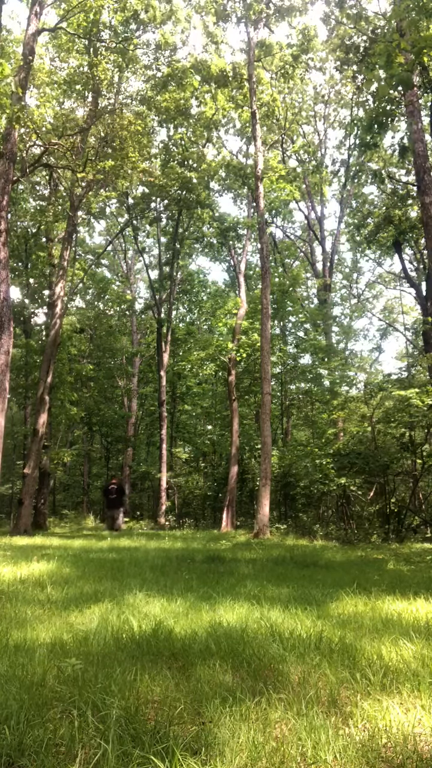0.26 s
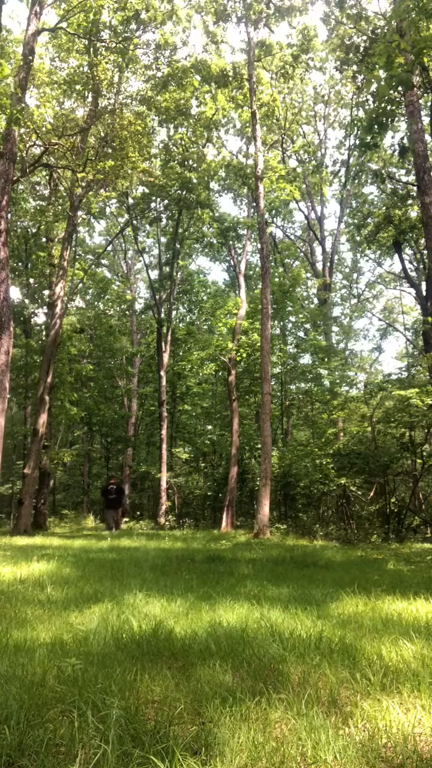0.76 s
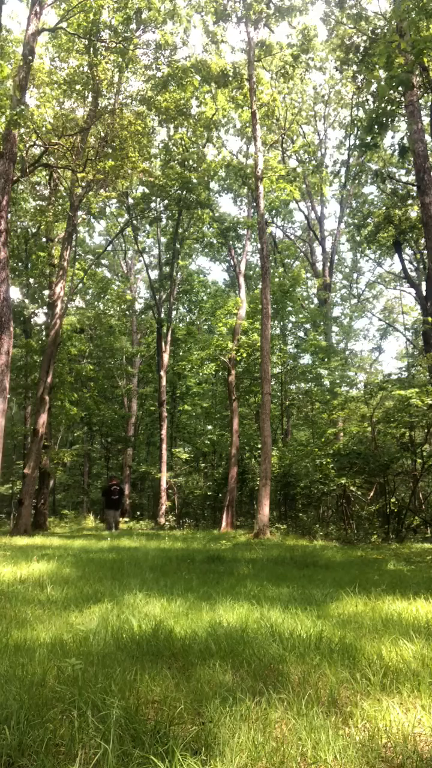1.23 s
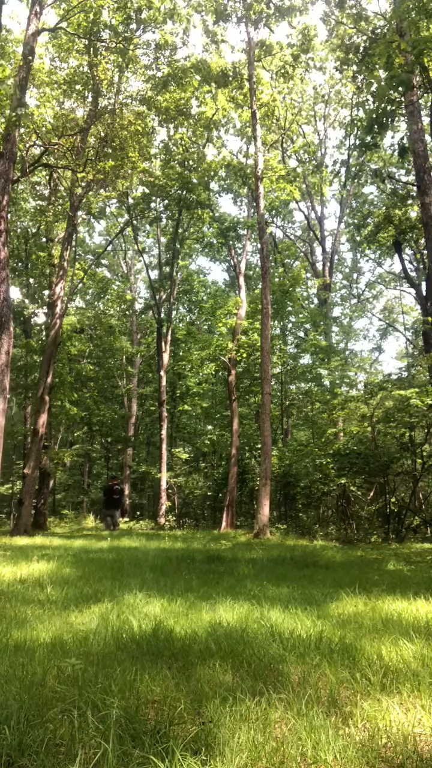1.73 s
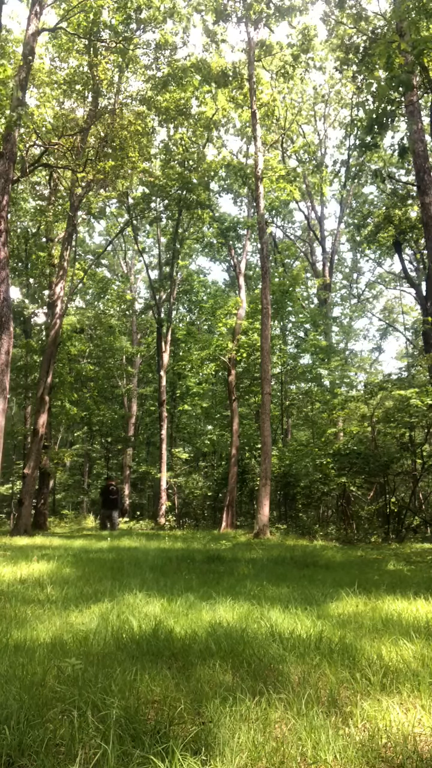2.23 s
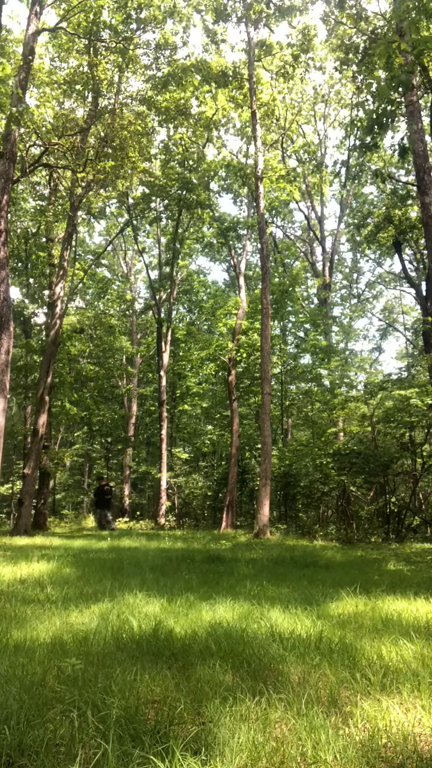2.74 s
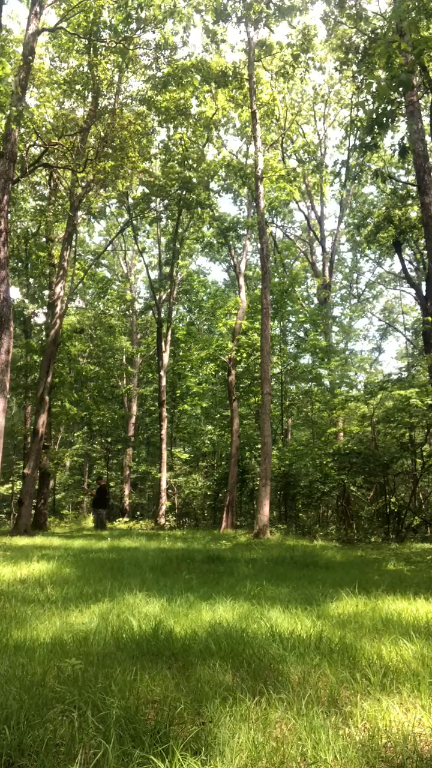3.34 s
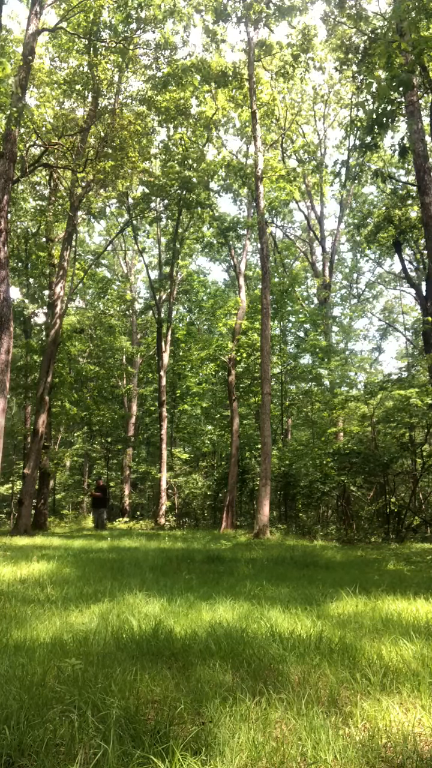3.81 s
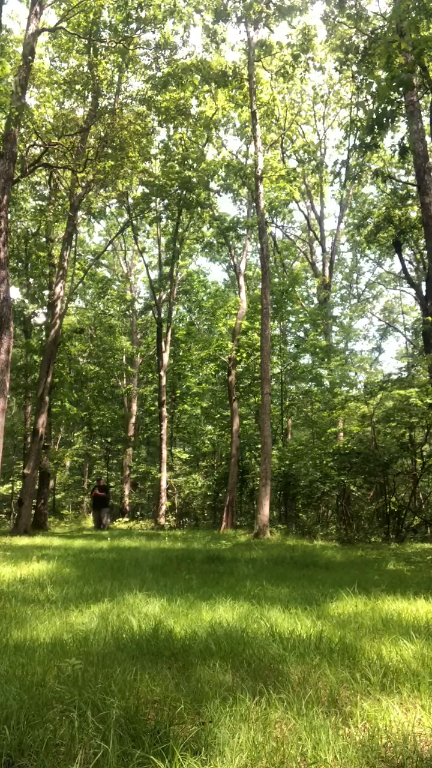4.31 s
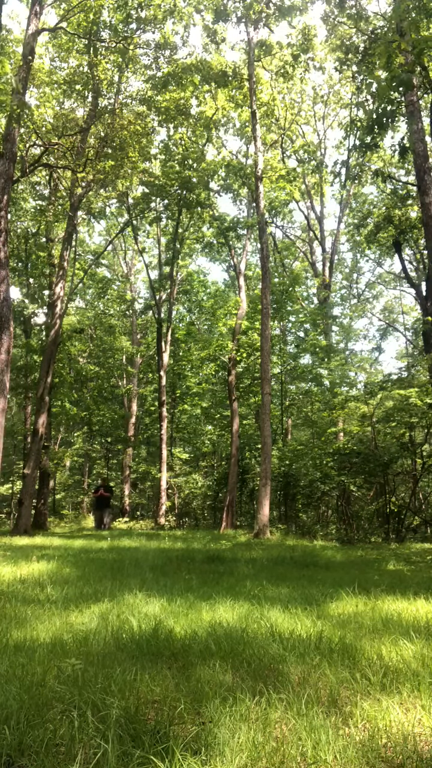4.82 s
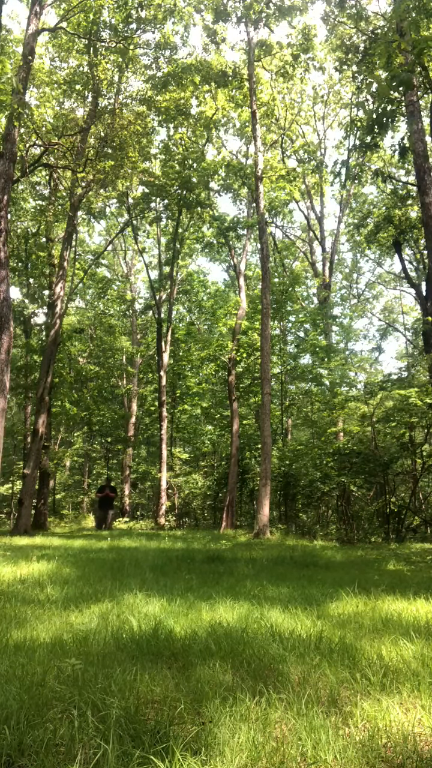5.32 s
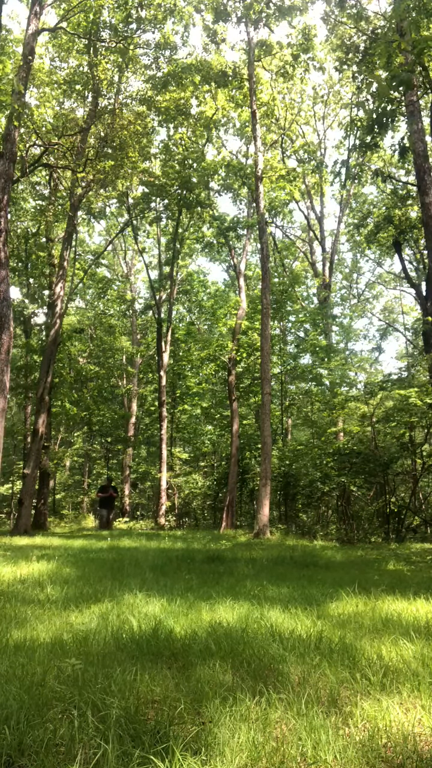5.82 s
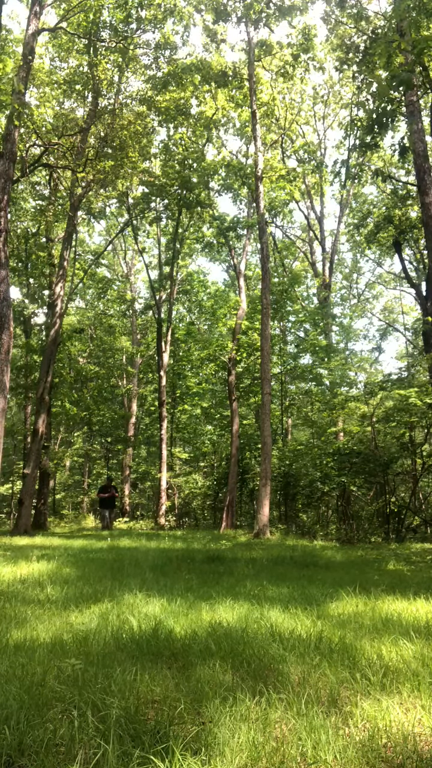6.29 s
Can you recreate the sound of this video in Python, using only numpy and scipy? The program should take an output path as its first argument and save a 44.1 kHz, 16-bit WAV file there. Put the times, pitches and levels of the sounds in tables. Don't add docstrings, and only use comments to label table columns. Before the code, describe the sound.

A distant wooden box call gives four raspy turkey-like yelps, quickening short clucks, then seven loud sharp cutts echoing through a quiet forest clearing.

```python
import sys
import numpy as np
from scipy import signal
from scipy.fft import rfft, irfft, next_fast_len
from scipy.io import wavfile
from scipy.ndimage import map_coordinates

SR = 44100
rng = np.random.default_rng(int(sys.argv[2]) if len(sys.argv) > 2 else 0)


def materialize(psi):
    bounded = np.clip(np.atleast_2d(psi).T, -1, 1)
    quanta = np.round(bounded * 32767).astype(np.int16)
    wavfile.write(sys.argv[1], SR, quanta)


def voltage_ratio(decibels):
    exponent = np.asarray(decibels, float) / 20
    return 10 ** exponent


N = 288855
LEAD = 4410

# (frequency [Hz], density [dB per Hz])
FOREST_RUMBLE = [(15, -47), (25, -7.5), (60, -3), (288, -16), (475, -16), (515, -13.5), (569, -16),
                 (849, -12), (1170, -19.5), (1290, -18), (1460, -19), (3000, -40.5), (3900, -87),
                 (6600, -120)]
# (time [s], level [dB])
RUMBLE_SWELL = [(0, -67), (2.7, -65), (3.3, -64), (5.1, -63.5), (6.55, -60.5)]
# (frequency [Hz], density [dB per Hz])
HISS = [(1180, -47), (2000, -6), (3020, -4), (3590, -5), (4270, -8), (7030, -12), (8420, -17),
        (15600, -21.5)]
# (time [s], level [dB])
ENGINE = [(0, -62.5), (.42, -68.5), (.58, -55.5), (.75, -70), (.93, -61.5), (1.79, -64.5), (2.06, -76),
          (2.44, -60), (2.72, -82), (3.4, -66), (3.67, -59), (5.09, -60), (5.75, -53.5), (6.55, -61)]
# (time [s], peak level [dB], frequency [Hz])
AIR_BUMPS = [
    (2.187, -47, 59.5),
    (2.449, -56, 56),
    (2.528, -50, 106),
    (2.639, -50, 98),
    (2.898, -48, 92),
    (3.068, -54, 83.4),
    (3.148, -44, 68.4),
    (3.248, -47.5, 107),
]
# (time [s], length [s], level [dB], start frequency [Hz], end frequency [Hz])
COOS = [
    (1.4, .68, -72, 520, 525),
    (2.13, .36, -69, 520, 520),
]
# (time [s], length [s], level [dB], start frequency [Hz], end frequency [Hz])
CHIRPS = [
    (1.72, .12, -83, 3300, 3900),
    (1.8, .11, -79, 2400, 2430),
    (1.85, .25, -85, 4050, 4030),
]
# (time [s], length [s], level [dB], start frequency [Hz], end frequency [Hz])
WHISTLES = [
    (2.47, .08, -77, 3700, 3680),
    (2.56, .1, -77, 3700, 3680),
]

# (frequency [Hz], time to fall 60 dB [s])
TRUNK_DECAY = [(1000, 1.16), (2500, 1.18), (5000, 0.72), (8000, 0.86), (14000, 0.13)]
# (frequency [Hz], gain [dB])
BARK_ECHO = [(1000, -18.5), (1400, 0), (1800, -5), (2600, -2.5), (4100, 5.5), (6000, 2), (10000, 2),
             (15000, 4)]
# (time [s], level towards the trees [dB])
FACING = [(0, 1.5), (.9, 1.1), (2.66, 1.5), (3.8, 0.5), (4.15, -0.5), (4.5, -3), (4.85, -4.5), (5.05, -0.1),
          (5.5, -2.9), (6.3, -1.8), (6.53, -7)]

# (time [s], clean part [s], raspy part [s], part on the wall's upper mode [s],
# level of that mode [dB])
YELPS = [
    (-0.047, .04, .066, .012, -4),
    (.25, .04, .072, 0, 0),
    (.552, .009, .07, .01, 1.5),
    (.846, .033, .041, .035, -4),
]
# (time [s], level [dB], settled slip rate [Hz], length [s],
# halfway lines at the end [dB])
CLUCKS = [(2.661, -45, 1483, 0.01, -10), (2.808, -42.5, 1443, 0.015, 1), (2.967, -47, 1409, 0.0132, 3),
          (3.31, -43.5, 1371, 0.013, -5.5), (3.451, -40.5, 1385, 0.013, -26),
          (3.619, -46.5, 1367, 0.014, -12), (3.786, -47, 1365, 0.016, 0), (3.949, -45.5, 1357, 0.018, -14),
          (4.116, -48, 1329, 0.017, -17), (4.285, -44, 1339, .016, -18), (4.457, -46, 1317, 0.018, -12.5),
          (4.641, -46.5, 1314, 0.015, -24), (4.832, -43, 1330, .023, -11.5),
          (5.031, -45.5, 1338, 0.0043, -22), (6.526, -48, 1340, .003, -18)]
# (time [s], level [dB], slip rate [Hz], length [s], halfway lines [dB])
CUTTS = [
    (5.034, -31, 1220, 0.029, -12.5),
    (5.249, -30, 1205, 0.027, -22),
    (5.49, -33.5, 1241, .012, -3),
    (5.736, -31, 1214, 0.016, -2.5),
    (6, -29, 1208, 0.026, -11),
    (6.27, -28.5, 1218, 0.034, -21.5),
    (6.53, -30, 1213, 0.028, -1),
]
# (frequency [Hz], gain [dB])
BOX_YELPS = [(600, -52), (1200, -13), (1800, 3), (2300, 4), (3000, -8), (3600, -17), (4800, -20.5),
             (6100, -18), (7000, -30), (8000, -29.5), (10000, -38), (15000, -58)]
# (frequency [Hz], gain [dB])
BOX_CLUCKS = [(600, -45), (1400, -7.5), (2100, 12.5), (3500, 0), (4200, -7), (4500, -6), (5700, -7.5),
              (7100, -11.5), (8400, -16.5), (9100, -25.5), (9900, -17.5), (11500, -25.5), (15000, -38)]
# (frequency [Hz], gain [dB])
BOX_CUTTS = [(600, -35), (1200, -18.5), (1850, 6), (2200, 12), (3000, -5.5), (3600, -8), (4900, -9.5),
             (6100, -16.5), (6600, -31), (7300, -22), (8500, -29), (11000, -35), (15000, -50)]

# (orders 1 and 3 [dB], order 2 [dB], halfway lines [dB], upper orders [dB])
CLEAN = (-7.5, -0.9, -24, -26)
BREAKING = (-14.5, -5, 0.3, -22)
RASPY = (-16, -5, -0.8, -16.5)
TIRING = (-6.5, -10, -7, -16)
FLIPPED = (-0.8, -8, -3, -20)
# (orders 1 and 3 [dB], order 2 [dB], upper orders [dB])
HELD_CLUCK = [
    (3, 0, -6.5),
    (-1, -2.5, -6.5),
    (-5.5, -1.2, -16.5),
]
# (orders 1 and 3 [dB], order 2 [dB], upper orders [dB])
SETTLED_CLUCK = [
    (2.5, 2.5, -8.5),
    (0, 1.5, -8),
    (-8, -8, -8.5),
]

# (frequency [Hz], gain [dB])
MICROPHONE = [(15, -21), (30, -12), (45, 0), (20000, 0.5)]
# (frequency [Hz], gain [dB])
BAND_EDGE = [(15760, 0), (15810, -70)]

BITE_HZ, CLEAN_HZ, BREAK_HZ, RASPY_HZ, TIRED_HZ, UPPER_HZ = 1376, 1303, 1234, 1190, 1128, 1450
DYING_HZ, RELAXED_HZ = 1175, 1198
YELP_DB, FADE_IN_DB = -43, -11
SWELL_DB_PER_S = 450.5
FLIP_S, FLIP_FADE_DB = 0.00396, -11.5

SAG_HZ, TAP_HZ = 25.2, 1421
CAPTURE_HZ, CAPTURE_SPAN_HZ = 1333.6, 40
RING_HZ, RING_DB_PER_HZ = 1409, 0.1303

BITE_OVER_HZ, SWELL_S, SPLIT_S = 35, 0.0048, 0.01
CUTT_SAG_HZ = 12.8
SPLIT_DB, RING_LOSS = -4, 1.2
FLIPS_ABOVE_DB = -8.5
CUTT_UPPER_HZ, CUTT_UPPER_DB = 1425, -29
SPENT_DB_PER_S, FLIPPED_CUTT_S = 700, 0.036


def unit(x):
    return x / np.sqrt(np.mean(x ** 2) + 1e-20)


def along(points, hz):
    f, v = np.transpose(points)
    return np.interp(np.log(hz + 1), np.log(f + 1), v)


def shaped(x, points):
    m = next_fast_len(len(x) + 2048)
    gain = voltage_ratio(along(points, np.fft.rfftfreq(m, 1 / SR)))
    return irfft(rfft(x, m) * gain, m)[:len(x)]


def coloured(points, size):
    return unit(shaped(rng.standard_normal(size), points))


def wobble(rate, size):
    knots = rng.standard_normal(int(size * rate / SR) + 4)
    return map_coordinates(knots, [np.arange(size) * rate / SR])


def forest():
    t = np.arange(N) / SR
    rumble_db = np.interp(t, *np.transpose(RUMBLE_SWELL)) + 3.5 + 0.63 * wobble(3.69, N)
    rumble = voltage_ratio(rumble_db) * coloured(FOREST_RUMBLE, N)
    hiss = voltage_ratio(-77.5) * coloured(HISS, N)
    phase = 2 * np.pi * np.cumsum(101.5 + 1.564 * wobble(5, N)) / SR
    drone = (np.sin(phase) + voltage_ratio(-30) * np.sin(2 * phase)) * voltage_ratio(1.9 * wobble(7, N))
    engine = voltage_ratio(np.interp(t, *np.transpose(ENGINE)) - 1.5) * drone
    return rumble + hiss + engine


def birds():
    out = np.zeros(N)
    for s, length, db, start_hz, end_hz in COOS + CHIRPS + WHISTLES:
        n = round(length * SR)
        glide_hz = np.linspace(start_hz, end_hz, n) * (1 + 0.006 * wobble(60, n))
        level = voltage_ratio(db + 3 * wobble(40, n)) * np.sqrt(np.hanning(n))
        out[round(s * SR):][:n] += level * np.sin(2 * np.pi * np.cumsum(glide_hz) / SR)
    return out


def bumps():
    out = np.zeros(N + SR)
    t = np.arange(SR // 10) / SR
    for s, db, hz in AIR_BUMPS:
        puff = np.exp(-((t * hz - 1.1) / 0.71) ** 2)
        out[round(s * SR):][:len(t)] += voltage_ratio(db) * np.sin(2 * np.pi * hz * t) * puff
    return out[:N]


def trunks(x, near_db, near_t60, far_db, swell):
    hz, t, z = signal.stft(rng.standard_normal(2 * SR), SR, nperseg=256)
    decay = voltage_ratio(-60 * t / along(TRUNK_DECAY, hz)[:, None])
    far = signal.istft(z * decay, SR, nperseg=256)[1]
    t = np.arange(len(far)) / SR
    far *= 1 - np.exp(-t / swell)
    near = rng.standard_normal(len(t)) * voltage_ratio(-60 * t / near_t60)
    near *= t > 0.008
    far = voltage_ratio(far_db) * far / np.linalg.norm(far)
    near = voltage_ratio(near_db) * near / np.linalg.norm(near)
    return signal.fftconvolve(x, shaped(far + near, BARK_ECHO))


def slip_rate(t, s, hz):
    glide = np.interp(t, s, hz)
    row = np.clip(np.searchsorted(s, t), 1, len(s) - 1)
    jump = np.abs(np.log(hz[row] / hz[row - 1])) > 0.11
    nearer = np.where(t - s[row - 1] < s[row] - t, hz[row - 1], hz[row])
    return np.where(jump, nearer, glide)


def stroke(rows, box, level_db, rise, fall, catch, jitter, flutter_db, scrape_db, tap_db):
    s, hz, *voices = np.transpose(rows)
    t = np.arange(s[0], s[-1] + 0.03, 1 / SR)
    age = t - s[0]
    main_db, ring_db, half_db, upper_db = (np.interp(t, s, v) + level_db for v in voices)

    hz = slip_rate(t, s, hz) * (1 + catch * np.exp(-age / 0.0027))
    doubling = voltage_ratio(half_db) / (voltage_ratio(half_db) + voltage_ratio(main_db) + voltage_ratio(ring_db))
    unsteady = jitter * (0.33 + doubling + 1.25 * np.exp(-age / 0.0039))
    turns = np.cumsum(hz * (1 + unsteady * wobble(409.6, len(t)))) / (2 * SR)

    k = np.arange(2, 25)[:, None]
    lines = voltage_ratio(along(box, k * hz / 2))
    groups = [((k == 2) | (k == 6), main_db), (k == 4, ring_db),
              (k % 2 == 1, half_db), ((k % 2 == 0) & (k > 6), upper_db)]
    sizes = 0
    for members, db in groups:
        sizes = sizes + members * lines * voltage_ratio(db) / np.sqrt(np.sum(members * lines ** 2, axis=0))
    flutter = np.tanh([wobble(231.7, len(t)) for _ in k])
    sizes = sizes * voltage_ratio(flutter_db * (0.08 + doubling + k / 18) * flutter)
    waves = np.sin(2 * np.pi * (k * turns + rng.random(k.shape)))
    tone = np.sqrt(2) * np.sum(sizes * waves, axis=0)

    scrape = (voltage_ratio(half_db) + 0.25 * voltage_ratio(upper_db)) * voltage_ratio(scrape_db) * coloured(box, len(t))
    scrape *= 1 + np.cos(2 * np.pi * turns)
    grip = np.clip(age / rise, 0, 1) * voltage_ratio(-60 * np.clip(t - s[-1], 0, 1) / fall)

    knock = np.sin(2 * np.pi * 1780 * age)
    knock += 0.11 * np.sin(2 * np.pi * 3150 * age) + 0.13 * np.sin(2 * np.pi * 5100 * age)
    tap = voltage_ratio(main_db[0] + tap_db - 60 * age / 0.01) * (1 - np.exp(-age / 0.00056)) * knock
    return tone * grip + tap, scrape * grip


def yelp(s, clean, raspy, flipped, flipped_db):
    split, end = s + clean, s + clean + raspy
    full_db = min(FADE_IN_DB + SWELL_DB_PER_S * clean, 0)
    stages = [(s, BITE_HZ, CLEAN, FADE_IN_DB),
              (s + 0.35 * clean, 0.7 * BITE_HZ + 0.3 * CLEAN_HZ, CLEAN, full_db - 3.5),
              (s + 0.88 * clean, CLEAN_HZ, CLEAN, full_db),
              (split + 0.0029, BREAK_HZ, BREAKING, 0.32 * full_db)]
    if flipped > 0.004:
        gone = end + max(flipped, FLIP_S + 0.001)
        stages += [(split + 0.419 * raspy, RASPY_HZ, RASPY, 0),
                   (split + 0.782 * raspy, TIRED_HZ, RASPY, -0.6),
                   (end, TIRED_HZ, TIRING, -1.5),
                   (end + FLIP_S, UPPER_HZ, FLIPPED, flipped_db),
                   (gone, UPPER_HZ, FLIPPED, flipped_db + FLIP_FADE_DB)]
    else:
        stages += [(split + 0.254 * raspy, DYING_HZ, RASPY, -0.4),
                   (split + 0.6 * raspy, DYING_HZ, RASPY, -3),
                   (split + 0.8 * raspy, RELAXED_HZ, TIRING, -0.6),
                   (end, RELAXED_HZ, TIRING, -6)]
    return [(at, hz, *(YELP_DB + swell_db + np.array(voice))) for at, hz, voice, swell_db in stages]


def cluck(s, db, hz, length, half_db):
    start_hz = max(hz + SAG_HZ, TAP_HZ)
    late = np.clip((hz - CAPTURE_HZ) / CAPTURE_SPAN_HZ, 0, 1)
    rate = np.array([start_hz, hz + 0.75 * late * (start_hz - hz), hz])
    blend = late * np.array(HELD_CLUCK) + (1 - late) * np.array(SETTLED_CLUCK)
    main_db, ring_db, upper_db = np.transpose(blend)
    ring_db = ring_db + RING_DB_PER_HZ * np.clip(RING_HZ - rate, 0, None)
    voices = [main_db, ring_db, [-16, 0.48 * half_db - 13.5, half_db], upper_db]
    return np.transpose([s + length * np.array([0, 0.45, 1]), rate, *(db + np.array(voices))])


def cutt(s, db, hz, length, half_db):
    lost_db = RING_LOSS * max(half_db - SPLIT_DB, 0)
    split = min(SPLIT_S, 0.9 * length)
    stages = [(0, hz + BITE_OVER_HZ, -25, -5, -24, -16),
              (SWELL_S, hz, -29, 0, 0.31 * half_db - 14, -14.5),
              (split, hz - CUTT_SAG_HZ / 2, -29, -0.8 - lost_db, half_db, -16 - lost_db),
              (length, hz - CUTT_SAG_HZ, -23, -9 - lost_db, 1.68 * half_db, -23 - lost_db)]
    stages = np.array(stages) + [s, 0, db, db, db, db]
    if half_db < FLIPS_ABOVE_DB or length > 0.7 * FLIPPED_CUTT_S:
        return stages
    upper = [(length + FLIP_S, -8, -18, -0.1, -22),
             (0.8 * FLIPPED_CUTT_S, -11, -14, -1.5, -22),
             (FLIPPED_CUTT_S, -15, -16, -7, -24)]
    upper_db = CUTT_UPPER_DB - SPENT_DB_PER_S * length
    return [*stages, *((s + at, CUTT_UPPER_HZ, *(upper_db + np.array(voice))) for at, *voice in upper)]


def played(strokes, near_db, near_t60, far_db, side_db, **touch):
    out = np.zeros(N + LEAD + 3 * SR)
    for rows in strokes:
        s = rows[0][0]
        tone, scrape = stroke(rows, **touch)
        echo = trunks(tone + voltage_ratio(side_db) * scrape, near_db, near_t60, far_db, swell=0.015)
        start = out[LEAD + round(s * SR):]
        start[:len(tone)] += tone + scrape
        start[:len(echo)] += voltage_ratio(np.interp(s, *np.transpose(FACING))) * echo
    return out[LEAD:LEAD + N]


def box_call():
    yelps = played([yelp(*row) for row in YELPS], box=BOX_YELPS, level_db=-0.5,
                   side_db=12, near_db=-9.5, near_t60=0.52, far_db=-8,
                   rise=0.0041, fall=0.04, catch=0.022, jitter=0.021,
                   flutter_db=5.5, scrape_db=-16.5, tap_db=-15)
    clucks = played([cluck(*row) for row in CLUCKS], box=BOX_CLUCKS, level_db=-0.53,
                    side_db=4.5, near_db=-9, near_t60=0.28, far_db=-10.5,
                    rise=0.00073, fall=0.038, catch=0.025, jitter=0.033,
                    flutter_db=6, scrape_db=-10, tap_db=7)
    cutts = played([cutt(*row) for row in CUTTS], box=BOX_CUTTS, level_db=0,
                   side_db=10.5, near_db=-9.5, near_t60=0.28, far_db=-15,
                   rise=0.001, fall=0.045, catch=0.08, jitter=0.019,
                   flutter_db=2.5, scrape_db=-10, tap_db=-24)
    return yelps + clucks + cutts


def scene():
    return (forest() + birds() + bumps() + box_call())[None]


def low_pass(x):
    return signal.sosfilt(signal.butter(12, 15780, fs=SR, output="sos"), x)


def record(dry):
    heard = shaped(dry[0], MICROPHONE)
    mix = shaped(heard, BAND_EDGE)[None]
    return low_pass(mix)


dry = scene()
out = record(dry)
materialize(out)
```